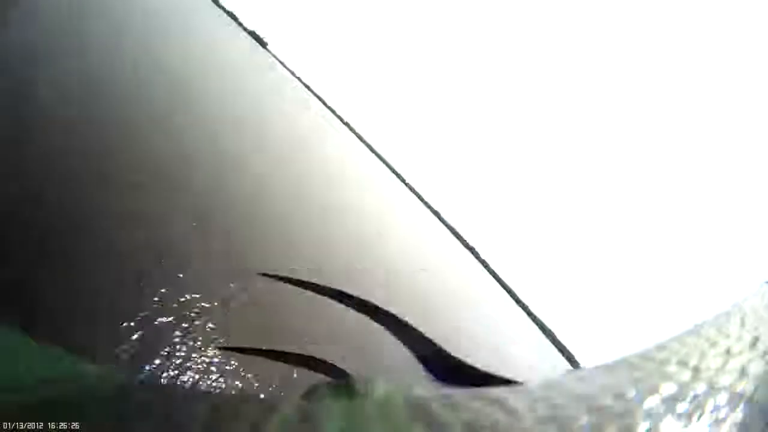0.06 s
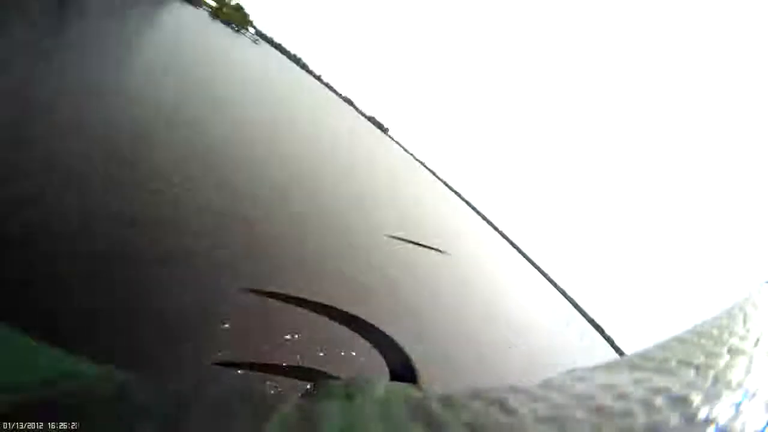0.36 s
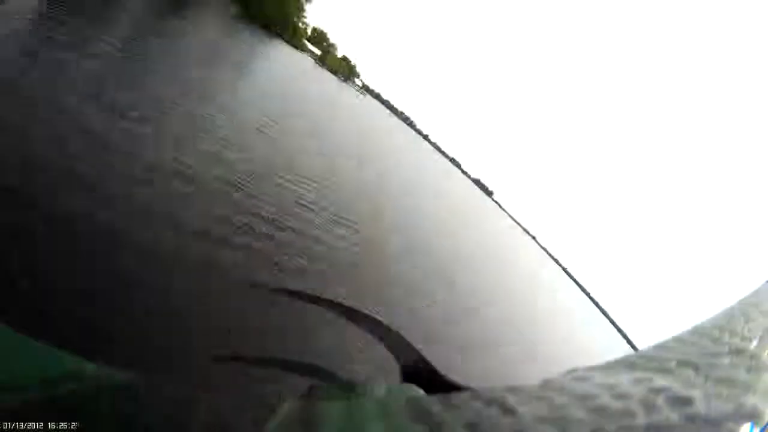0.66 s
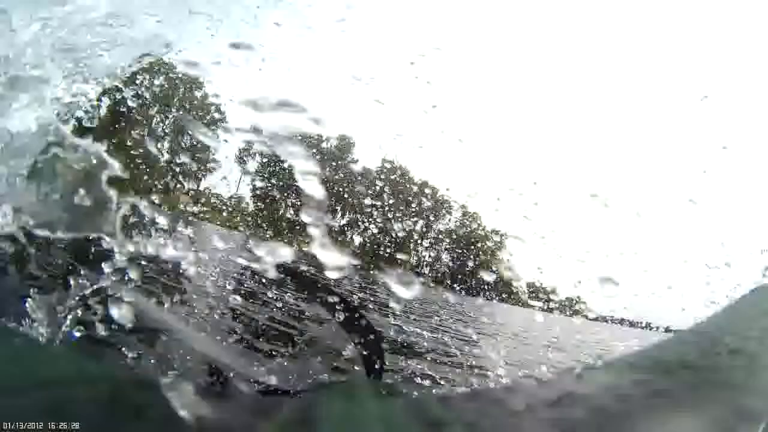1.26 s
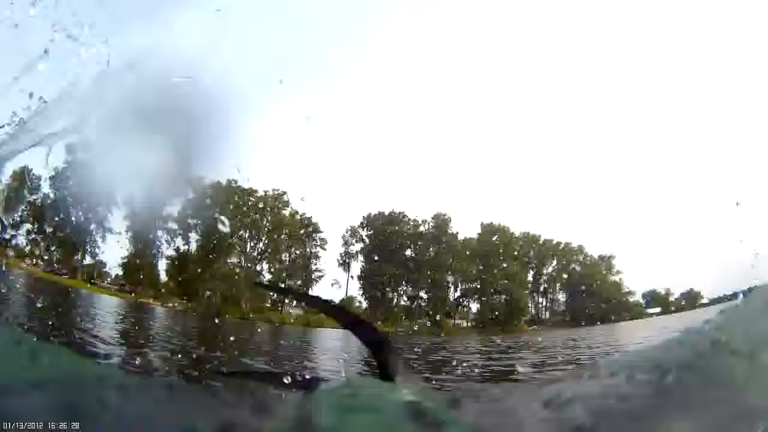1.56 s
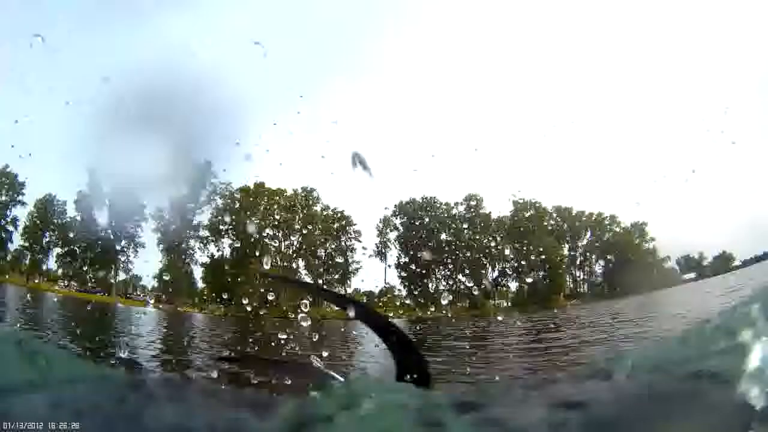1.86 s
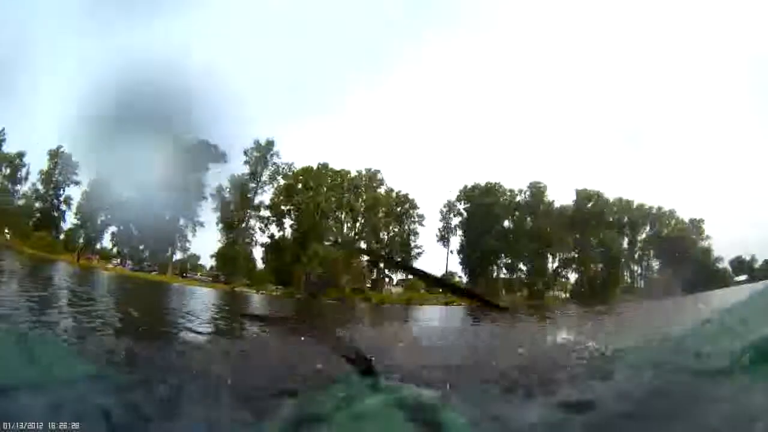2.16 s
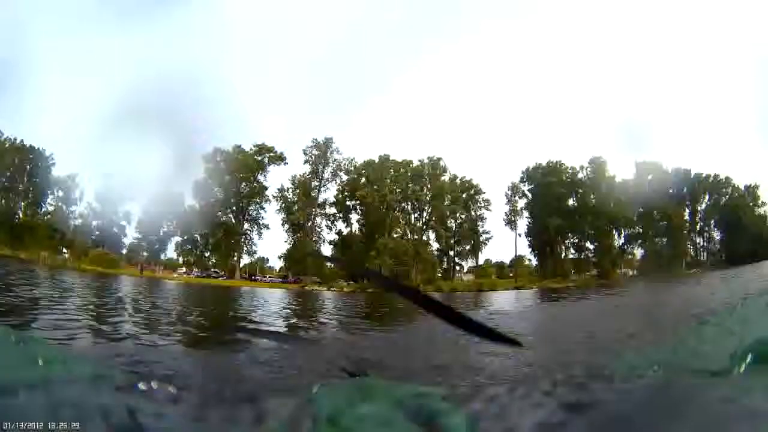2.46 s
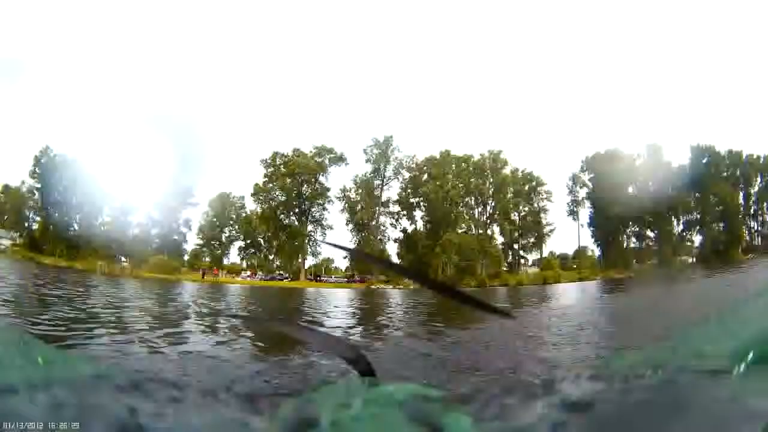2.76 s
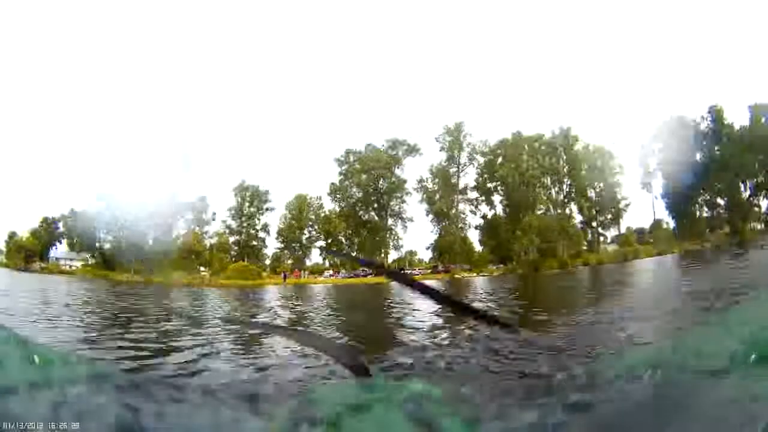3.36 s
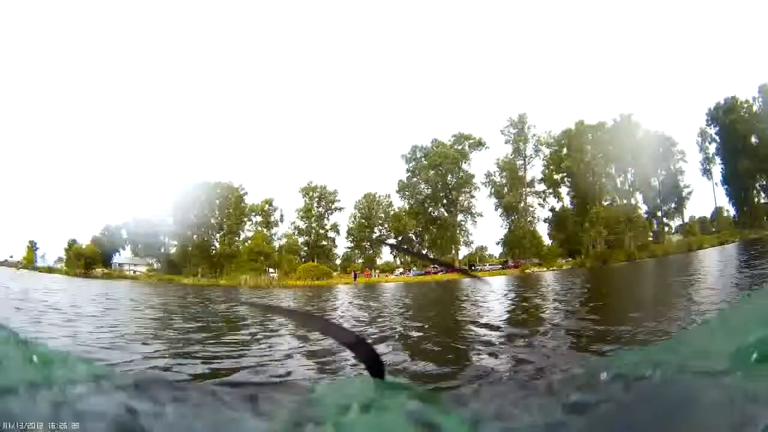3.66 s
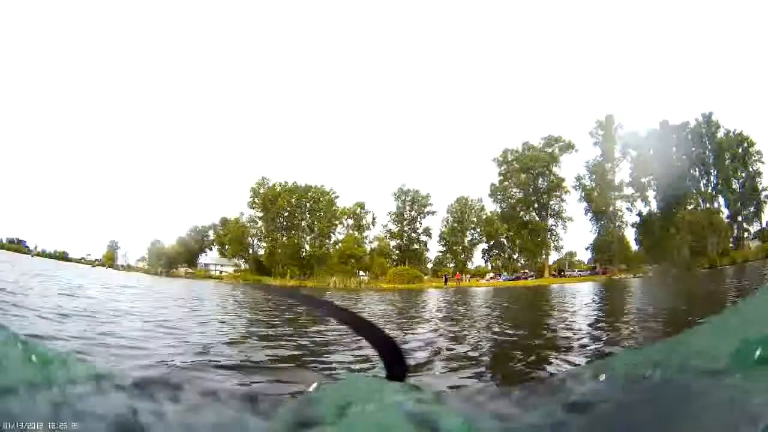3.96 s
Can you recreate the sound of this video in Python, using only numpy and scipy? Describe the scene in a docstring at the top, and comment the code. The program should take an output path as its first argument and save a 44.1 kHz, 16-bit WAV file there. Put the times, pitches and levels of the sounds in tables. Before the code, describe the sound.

A small model seaplane splashes onto a lake, heard from its own hull. Wind buffets the microphone first, then the loud splash breaks into pattering spray, leaving a faint motor hum, a thin whine and softly churning water.

```python
"""A small electric model seaplane glides in low and lands on a lake, heard from its own hull.
Wind buffets the microphone until the hull hits the water, and spray rains back on the plane.
The motor speeds up and hums while its speed controller whines. As the plane taxis,
water churns, bubbles ring and little waves toss droplets at the hull.
The sound cuts out briefly during the glide and again at the very end."""
import sys
import numpy as np
from scipy import signal
from scipy.fft import rfft, irfft
from scipy.io import wavfile

SR = 44100
rng = np.random.default_rng(int(sys.argv[2]) if len(sys.argv) > 2 else 0)


def persist_wave(psi):
    """Save psi, clipped to +-1, as 16-bit WAV."""
    counts = np.round(np.clip(psi, -1, 1) * 32767).astype(np.int16)
    wavfile.write(sys.argv[1], SR, np.atleast_2d(counts).T)


N = 176400
T = np.arange(N) / SR
TICK_HZ, TICKS_PER_S = 12020, 230

# tone of droplets hitting the plane: pitch_hz, level_db
DROPLET_TONE = [(1400, 0.5), (3700, -14.5), (5000, 0), (6500, -12), (15500, -17.5)]


def amp(db):
    """Turns decibels into a number to multiply by."""
    return 10 ** (np.asarray(db) / 20)


def unit(x):
    """Scales a signal to an average strength (rms) of 1."""
    return x / np.sqrt(np.mean(x ** 2) + 1e-20)


def level(points, column=1):
    """Loudness over time from a dB table; one starting at 0.5 s or later is silent until then."""
    rows = np.array(points)
    started = (T >= rows[0, 0]) | (rows[0, 0] < .5)
    return amp(np.interp(T, rows[:, 0], rows[:, column])) * started


def add(mix, start_s, sound):
    """Mixes a sound in at the given time."""
    part = mix[round(start_s * SR):][:len(sound)]
    part += sound[:len(part)]


def colour(x, tone):
    """Filters a signal with a table of pitch_hz, level_db; the result has strength 1."""
    hz, db = np.transpose(tone)
    grid_hz = abs(np.fft.fftfreq(4096, 1 / SR)) + 1
    log_gain = np.log(amp(np.interp(np.log(grid_hz), np.log(hz), db)))
    response = np.exp(np.conj(signal.hilbert(log_gain)))  # rings after a hit, never before
    taps = np.fft.ifft(response).real[:2048]
    return unit(signal.oaconvolve(x, taps)[:N])


def drift(hz):
    """Smooth random wandering, up to about hz wiggles a second, with strength 1."""
    f = np.fft.rfftfreq(N, 1 / SR)
    return unit(irfft(rfft(rng.standard_normal(N)) * np.exp(-(f / hz) ** 2) * (f > 0), N))


def clicks(per_s, spread_db):
    """Hits of uneven size at random times."""
    size = amp(spread_db * np.minimum(rng.exponential(1, N), 3.5))
    return size * rng.choice([-1, 1], N) * (rng.random(N) < per_s / SR)


def strike(t, rise_s, decay_s):
    """The loudness of one hit: a straight rise, then a dying tail."""
    return np.minimum(t / rise_s, np.exp((rise_s - t) / decay_s))


def eddies(lump_db=1.5, burst_db=5.5, crackle_db=-10):
    """Swirls of air thump on the microphone, and the strongest ones crackle."""
    # tone of the low thumping: pitch_hz, level_db
    buffet_tone = [(20, -9.5), (200, -2), (450, -1.5), (750, -7), (1400, -11), (2400, -23.5), (15000, -54)]
    # tone of the crackle: pitch_hz, level_db
    crackle_tone = [(200, -0.5), (1200, 6.5), (3600, -4.5), (4800, -2.5), (6000, -10), (8500, -8),
                    (15500, -44.5)]
    swirl = drift(hz=260)
    buffet = colour(rng.standard_normal(N) * amp(lump_db * swirl), buffet_tone)
    bursts = amp(burst_db * np.minimum(swirl, 2.6))
    return buffet + amp(crackle_db) * colour(rng.standard_normal(N) * bursts, crackle_tone)


def ticks():
    """Tiny bright taps on the housing around the microphone, a few of them louder."""
    tick = np.hanning(36) * np.sin(2 * np.pi * TICK_HZ * T[:36])
    return unit(signal.oaconvolve(clicks(TICKS_PER_S, spread_db=3), tick)[:N])


def wind(ticks_db=-27):
    """Air rushes past with a fine rattle in flight; later one gust blows on the water."""
    # airflow over the microphone: time_s, level_db
    airflow = [(0, -28.5), (.14, -25), (.45, -24), (.62, -27), (1.19, -22.5), (1.3, -19.5), (1.46, -65)]
    # the late gust: time_s, level_db
    gust_levels = [(3.55, -73), (3.8, -48), (3.94, -41.5), (3.98, -25)]
    # its deep tone: pitch_hz, level_db
    gust_tone = [(20, 7), (100, 3), (600, -6), (12000, -40.5)]
    gust = colour(rng.standard_normal(N) * amp(2 * drift(hz=150)), gust_tone)
    return level(airflow) * (eddies() + amp(ticks_db) * ticks()) + level(gust_levels) * gust


def controller(shaft_angle, switch_hz=7975, side_db=-14.5, side_per_turn=30):
    """The speed controller's switching whines; a softer side tone sinks as the shaft speeds up."""
    # loudness of the whine: time_s, level_db
    whine_levels = [(0, -41), (1.45, -48), (1.93, -44), (2.3, -58.5), (2.55, -50), (2.7, -52), (3.1, -47),
                    (3.22, -50), (3.68, -48.5), (3.95, -43.5)]
    switch_phase = 2 * np.pi * switch_hz * T + .1 * drift(hz=25)
    side_tone = amp(side_db + drift(hz=12)) * np.cos(switch_phase - side_per_turn * shaft_angle)
    flicker = amp(.5 * drift(hz=30))
    return np.sqrt(2) * level(whine_levels) * (np.cos(switch_phase) + side_tone) * flicker


def motor(shaft_angle, wobble_db=-56):
    """The unbalanced propeller shakes once a turn; after landing the motor's hum joins in."""
    # loudness of the hum: time_s, level_db
    hum_levels = [(1.5, -49.5), (2.0, -51.5), (2.35, -52.5), (2.9, -45.5), (3.95, -44)]
    # tones in the hum: pulses_per_turn, level_db
    hum_tones = [(6, -10.5), (7, -10.5), (10, 0), (13, -13), (20, -14), (21, -12.5), (37, -11), (40, -15.5)]
    hum = np.zeros(N)
    for per_turn, db in hum_tones:
        wavering = amp(db + .5 * drift(hz=6))
        hum += wavering * np.cos(per_turn * shaft_angle + 2 * np.pi * rng.random())
    return np.sqrt(2) * (level(hum_levels) * hum + amp(wobble_db) * np.cos(shaft_angle))


def patter(per_s, spread_db, cycles, hiss):
    """A cloud of drops and bubbles, low to high, each ringing a few cycles over a smooth hiss."""
    t, out = T[:2048], np.zeros(N)
    pitches_hz = np.geomspace(180, 15000, 32)
    shares = np.sqrt(pitches_hz) / np.sqrt(pitches_hz).sum()
    for hz, share in zip(pitches_hz, shares):
        ring = np.sin(2 * np.pi * hz * t) * np.exp(-t * hz / cycles)
        out += np.sqrt(hz) * unit(signal.oaconvolve(clicks(per_s * share, spread_db), ring)[:N])
    return unit(out) + hiss * rng.standard_normal(N)


def splash(plunge_end_s=1.315, blend_s=0.09, dulling_db=-11.5, ticks_db=-11):
    """The hull plunges in under a sheet of spray, which thins into drops drumming on the plane."""
    # water thrown up by the hull: time_s, body_level_db, spray_level_db
    splash_levels = [(1.205, -47, -51), (1.212, -19, -28), (1.245, -20.5, -22.5), (1.262, -7, -12),
                     (1.28, -19.5, -20.5), (1.32, -30, -27.5), (1.35, -32.5, -34.5), (1.43, -33.5, -40.5),
                     (1.66, -36.5, -42), (1.8, -39, -40.5), (1.93, -38.5, -48.5), (2.1, -48, -53),
                     (2.2, -44, -51.5), (2.27, -65, -65.5)]
    # tone of the hull going in: pitch_hz, level_db
    plunge_tone = [(30, -18), (260, 4), (1050, -13), (1600, -6.5), (2300, -21), (5000, -54)]
    # tone of water drumming on the plane: pitch_hz, level_db
    drumming_tone = [(40, -3.5), (270, -2.5), (820, -0.5), (1100, -4.5), (1600, -1.5), (2300, -9.5),
                     (6000, -28.5)]
    # tone of the fine spray: pitch_hz, level_db
    spray_tone = [(1000, -44), (2600, -2), (5000, -1), (5900, -1.5), (7100, 5.5), (12300, 4.5),
                  (15800, -7.5)]
    plunge = colour(rng.standard_normal(N), plunge_tone)
    drumming = colour(patter(per_s=3500, spread_db=3.5, cycles=3.2, hiss=0.64), drumming_tone)
    sheet = colour(patter(per_s=13000, spread_db=5, cycles=1.6, hiss=0.28), spray_tone)
    shower = colour(patter(per_s=1300, spread_db=5.5, cycles=1.1, hiss=0.7), spray_tone)
    shower = colour(shower, [(5000, 0.0038), (12000, dulling_db)]) + amp(ticks_db) * ticks()
    blend = np.clip((T - plunge_end_s) / blend_s + .5, 0, 1)
    before, after = np.sqrt(1 - blend), np.sqrt(blend)
    body = before * plunge + after * drumming
    spray = before * sheet + after * shower
    return level(splash_levels) * body + level(splash_levels, column=2) * spray


def drops(rough=0.63, width_hz=1500, rise_s=0.00095, decay_s=0.0012, click_db=-5.5):
    """Large drops land on the plane, each with a crisp click and a short, rough ring."""
    # single drops: start_s, level_db, pitch_hz
    hits = [(1.2126, -14, 11900), (1.224, -12, 11500), (1.45, -24, 11200), (1.7495, -28, 12200),
            (1.758, -22.5, 11400), (1.7752, -20, 7140), (1.806, -25, 1380), (1.9008, -34.5, 3230),
            (1.933, -23, 5170), (2.051, -36, 9300), (2.127, -29.5, 1410), (2.1605, -27, 7700),
            (2.182, -40, 4600)]
    t, out = T[:1500], np.zeros(N)
    fizz = colour(rng.standard_normal(N), DROPLET_TONE)
    for start_s, db, hz in hits:
        smoothing = signal.butter(2, width_hz * np.sqrt(hz / TICK_HZ) * 2, fs=SR)
        grit = signal.lfilter(*smoothing, rng.standard_normal((2, len(t))))  # blurs the pitch
        phase = 2 * np.pi * hz * t
        ring = (1 + rough * unit(grit[0])) * np.sin(phase) + rough * unit(grit[1]) * np.cos(phase)
        click = amp(click_db) * fizz[round(start_s * SR):][:len(t)]
        add(out, start_s, amp(db) * (ring + click) * strike(t, rise_s, decay_s))
    return out


def bubbles(rise_s=0.0049, decay_s=0.024, climb_per_s=0.56, rough=0.45):
    """Trapped air rings under the hull, climbing a little in pitch."""
    # gulping air pockets: start_s, level_db, pitch_hz
    pockets = [(1.637, -28.5, 687), (1.645, -32, 253), (1.846, -37, 832), (1.907, -27.5, 246),
               (2.163, -37.5, 253)]
    out = np.zeros(N)
    for start_s, db, hz in pockets:
        t = np.maximum(T - start_s, 0)
        ring = np.sin(2 * np.pi * hz * t * (1 + climb_per_s * t / 2))
        out += amp(db) * strike(t, rise_s, decay_s) * ring
    return out * (1 + rough * drift(hz=300))


def wake(shaft_angle, gurgle_db=-10, burst_db=3.5, half_width_s=0.027):
    """The taxiing hull churns the water, with gurgles chopped by the two propeller blades."""
    # loudness of the churning: time_s, level_db
    churn_levels = [(1.8, -51.5), (2.38, -55.5), (2.52, -45.5), (2.7, -51), (3.0, -46), (3.22, -50),
                    (3.6, -48.5)]
    # tone of the churning: pitch_hz, level_db
    churn_tone = [(30, -4.5), (300, 0.5), (620, -4), (1380, -2.5), (3500, -29), (4800, -16), (5700, -28.5),
                  (7200, -15.5), (10500, -30), (12400, -29), (15500, -42)]
    # clusters of gurgles under the hull: middle_s, level_db
    clusters = [(2.55, -57), (2.9, -57), (3.02, -52), (3.36, -58), (3.6, -56.5), (3.73, -54.5)]
    # tone of the gurgles: pitch_hz, level_db
    gurgle_tone = [(500, -11), (1300, 3), (2250, 1.5), (3300, -13), (9000, -60)]
    swirl = np.minimum(drift(hz=77), 2)
    churn = colour(rng.standard_normal(N) * amp(swirl), churn_tone)
    chop = np.exp(np.cos(2 * shaft_angle)) * amp(burst_db * swirl)
    gurgle = colour(rng.standard_normal(N) * chop, gurgle_tone)
    swells = sum(amp(db) * np.exp(-.5 * ((T - s) / half_width_s) ** 2) for s, db in clusters)
    loudness = level(churn_levels)
    return loudness * churn + (amp(gurgle_db) * loudness + swells) * gurgle


def spatters(rise_s=0.0025, decay_s=0.012):
    """Little waves toss short, dense showers of droplets against the hull."""
    # the showers: start_s, level_db
    showers = [(2.005, -33.5), (2.458, -41), (2.48, -44), (2.499, -44), (2.889, -50)]
    fizz = colour(rng.standard_normal(N) * amp(2 * drift(hz=250)), DROPLET_TONE)
    return fizz * sum(amp(db) * strike(np.maximum(T - s, 0), rise_s, decay_s) for s, db in showers)


def scene():
    """Adds air, motor and water together at one microphone."""
    # speed of the motor shaft: time_s, turns_per_s
    shaft_speeds = [(0, 21.8), (1.2, 23.6), (1.6, 34), (1.8, 36.6), (2.35, 39.05), (4, 39.25)]
    turns_per_s = np.interp(T, *np.transpose(shaft_speeds)) * (1 + .0008 * drift(hz=10))
    shaft_angle = 2 * np.pi * np.cumsum(turns_per_s) / SR
    air = wind()
    water = splash() + drops() + bubbles() + spatters() + wake(shaft_angle)
    return (air + water + motor(shaft_angle) + controller(shaft_angle))[None]


def record(dry, top_hz=15850):
    """Rounds off loud peaks, cuts the sound out twice and removes the highest treble."""
    # silent gaps: start_s, end_s
    gaps = [(.6325, .765), (3.987, 4.1)]
    sound_on = np.prod([(T < start) | (T > end) for start, end in gaps], axis=0)
    treble_cut = signal.firwin(511, top_hz, window=("kaiser", 9), fs=SR)
    return signal.oaconvolve(np.tanh(dry) * sound_on, treble_cut[None], "same")


dry = scene()
out = record(dry)
persist_wave(out)
```